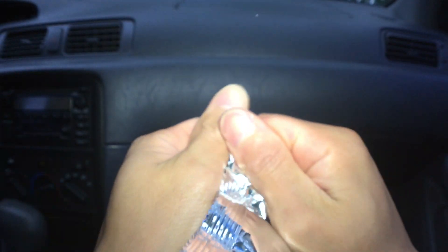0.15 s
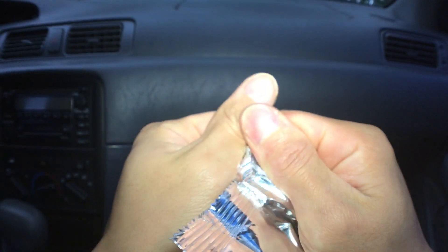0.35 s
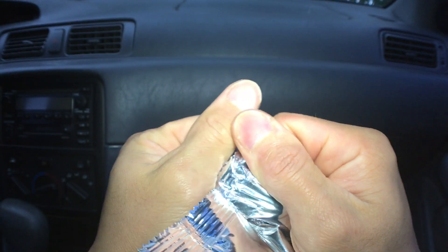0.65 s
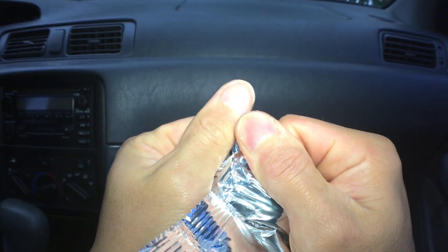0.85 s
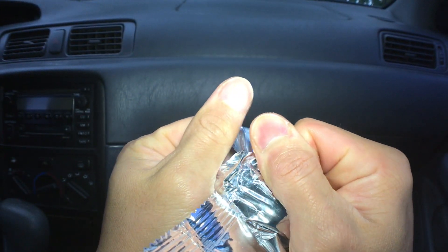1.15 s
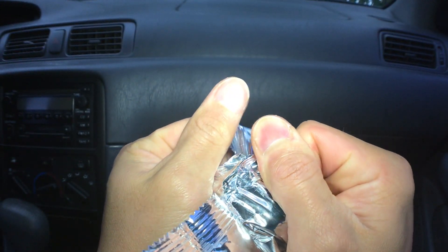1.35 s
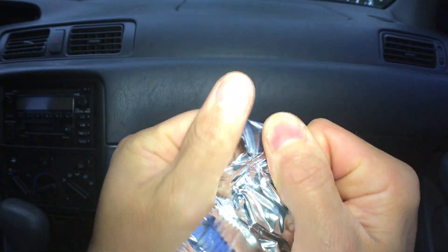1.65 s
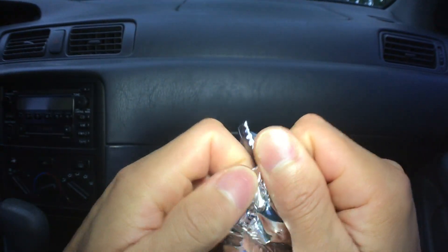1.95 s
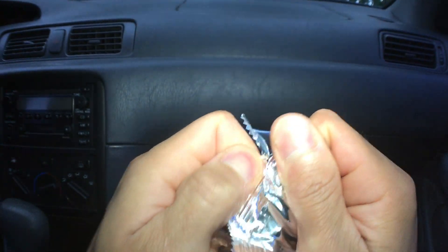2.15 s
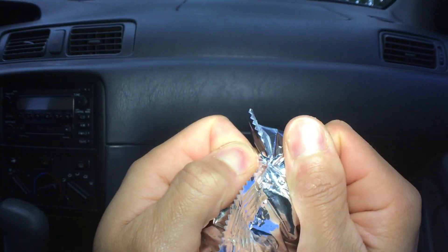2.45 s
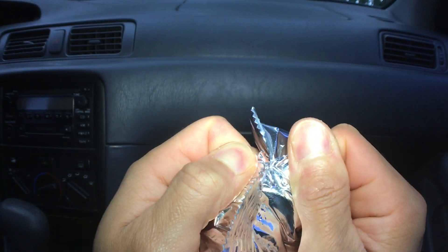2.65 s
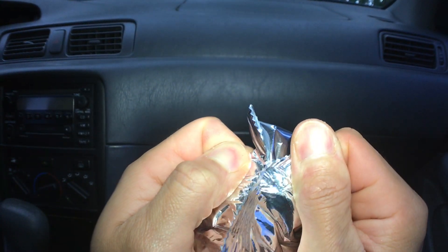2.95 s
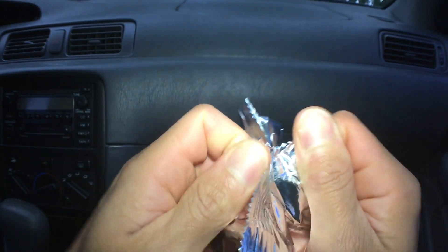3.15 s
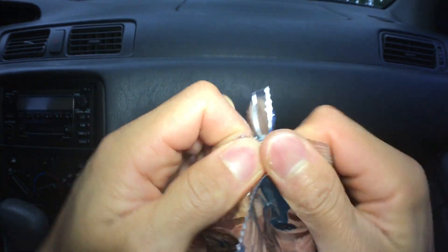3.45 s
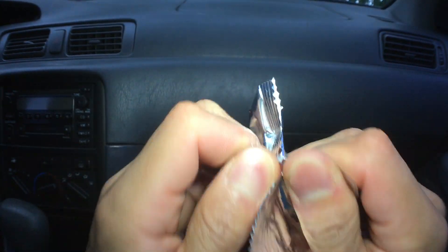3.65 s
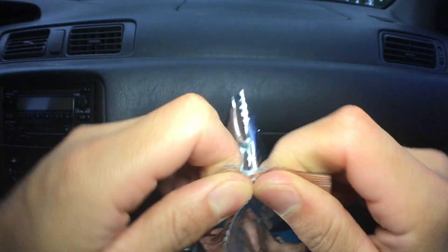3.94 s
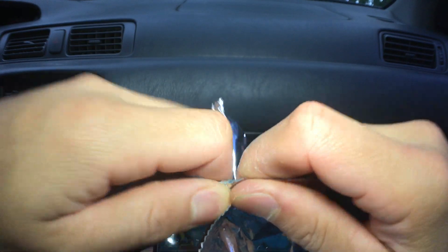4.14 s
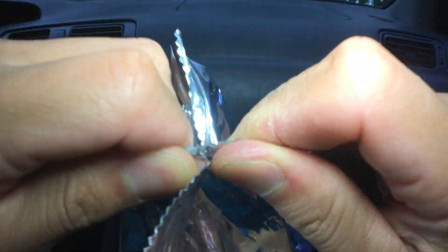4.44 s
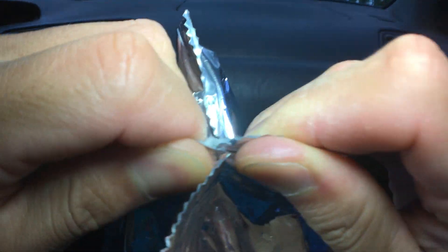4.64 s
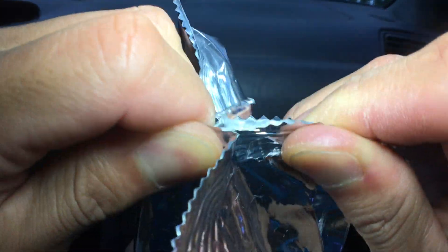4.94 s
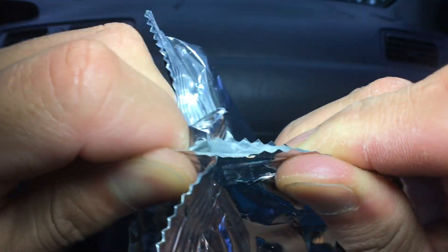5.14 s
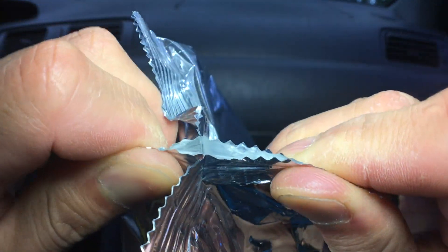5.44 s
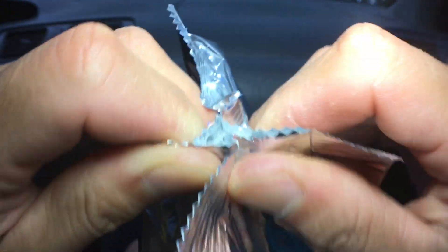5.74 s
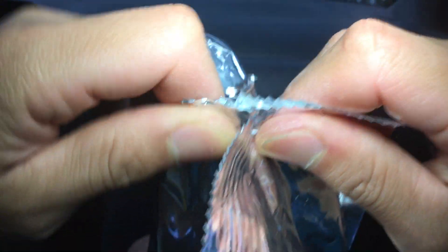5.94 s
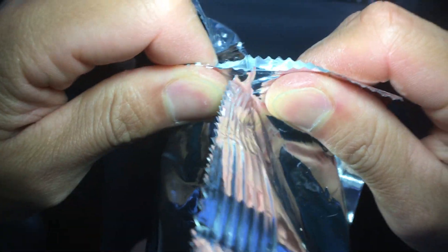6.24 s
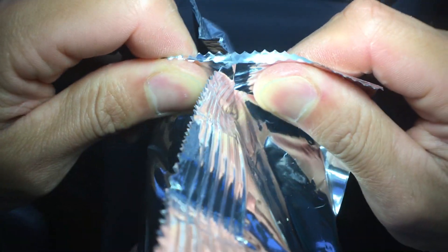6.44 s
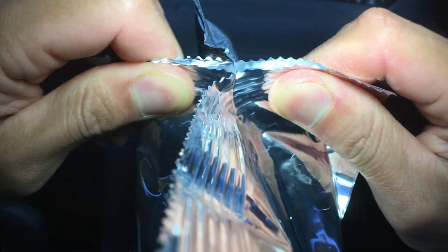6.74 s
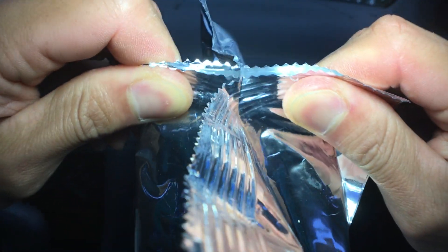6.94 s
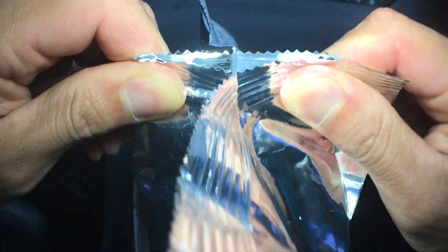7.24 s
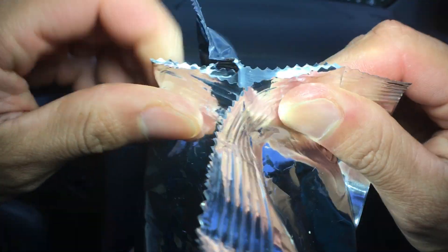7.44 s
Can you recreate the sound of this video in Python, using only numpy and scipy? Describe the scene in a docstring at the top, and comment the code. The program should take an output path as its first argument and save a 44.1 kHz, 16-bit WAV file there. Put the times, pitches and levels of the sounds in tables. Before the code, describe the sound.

An engine idles with a low, slightly pulsing hum while hands work a crisp metallic film pouch right at the microphone. Dense crackling and zippy sliding opens, then separate crunchy bursts follow with dull finger knocks and brief pitched pops. The handling grows gentler, leaving isolated clicks and faint crinkles. The small cabin is dry, with only a very short ring after each click.

```python
"""Two hands twist and pull at a foil pouch close to the microphone in a parked car.
From the start the idling engine hums in the cabin as stacked sines and the pouch crumples in random clicks.
Soon creases snap through in runs of buckles, taut film slides in stick-slip ticks and panels pop as decaying
sines. Just before one second a ridge ratchets; from two seconds on fingers knock and the grip shifts.
Clicks carry a very short ring from hands and dashboard; the crumpling thins out towards the end."""
import sys
import numpy as np
from scipy import signal
from scipy.fft import rfft, irfft
from scipy.io import wavfile
from scipy.ndimage import uniform_filter1d

SR = 44100
rng = np.random.default_rng(int(sys.argv[2]) if len(sys.argv) > 2 else 0)


def unload_wav(signal):
    """Save mono or channel-first audio to the path in sys.argv[1] as 16-bit WAV at rate SR, clipped to [-1, 1]."""
    wavfile.write(
        sys.argv[1],
        SR,
        np.round(np.clip(np.atleast_2d(signal).T, -1, 1) * 32767).astype(np.int16),
    )


N = 334719
TIME = np.arange(N) / SR  # seconds

# Idling engine. Each row: time in seconds, mean firing rate in Hz.
IDLE = [(0, 46.45), (1.2, 45.66), (2.6, 45.26), (3.05, 44.35), (3.6, 46.39), (5.1, 46.28), (7.55, 44.1)]
# Boom of the body. Each row: time in seconds, then mean level in dB at 1, 2, 3 and 4 times the firing rate.
BOOM = [(0, -54, -51.5, -50, -61), (0.6, -47, -56, -45.5, -63), (1.05, -45.0, -48, -45, -50.5),
        (1.7, -45.5, -46.5, -43, -50.5), (2.4, -50.5, -45.5, -51, -54.5), (3.0, -58, -46.5, -54, -54),
        (3.9, -70, -49.5, -57, -59), (5.0, -72.5, -55, -53.5, -57.5), (5.8, -65, -57, -70, -60),
        (7.5, -59, -60, -61, -61)]
# Colour of the cabin air. Each row: frequency in Hz, relative density in dB per Hz.
CABIN_COLOUR = [(28, 2.5), (50, -11), (120, 1), (170, -1), (280, -13), (2000, -36.5), (16000, -32)]
# Squeezes of the pouch. Each row: start in seconds, length in seconds, relative level in dB, brightness in dB.
SQUEEZES = [(0, 0.0094, -33, 2), (0.069, 0.4, -41.5, 4), (0.516, 0.25, -45.5, 1),
            (0.977, 0.223, -49.5, -3.5), (1.208, 0.35, -48, 3.5), (1.617, 0.19, -43.5, -1),
            (1.789, 0.19, -46.5, -2.5), (2.019, 0.12, -46.5, 1), (2.099, 0.093, -37, 2),
            (2.266, 0.017, -40.5, 0.5), (2.335, 0.13, -49.5, 2.5), (2.494, 0.032, -38, 2.5),
            (2.586, 0.48, -55.5, 4), (3.119, 0.18, -43, -5), (3.308, 0.16, -46.5, 0), (3.504, 0.11, -43, 2),
            (3.573, 0.19, -39.5, -1), (3.79, 0.046, -44.5, 2), (3.902, 0.062, -50.5, -1.5),
            (3.99, 0.086, -42.5, 0), (4.131, 0.19, -53.5, -0.5), (4.339, 0.14, -60.5, -7),
            (4.473, 0.077, -62.5, -3), (4.658, 0.076, -58, -5), (4.844, 0.05, -50, -0.5),
            (4.968, 0.043, -57.5, -5.5), (5.064, 0.18, -70, 4.5), (5.752, 0.044, -50, 3),
            (5.836, 0.4, -59, -4), (6.239, 0.094, -63, -6), (6.535, 0.03, -58, 9),
            (6.788, 0.064, -56.5, -5), (6.9, 0.066, -69.5, -13), (7.063, 0.054, -62.5, -6),
            (7.167, 0.033, -52, -1), (7.246, 0.16, -59.5, -3), (7.417, 0.067, -69.5, -11)]
# Colour of snaps and crumpling. Each row: frequency in Hz, relative gain in dB.
FOIL_COLOUR = [(200, -15), (550, -2.5), (790, -9), (1150, -0.5), (1600, 2), (2400, 3.5), (3600, 2.5),
               (5500, -3), (7500, -4.5), (12000, 0.5), (16000, -5)]
# Creases snapping through. Each row: start in seconds, relative levels in dB of panel (210-1010 Hz),
# crack (1.3-5.25 kHz) and sizzle (above 6.6 kHz), half the time over which the buckles spread in seconds.
SNAPS = [(0.0815, -40.5, -38, -28.5, 0.0085), (.106, -34, -22, -19.5, 0.00037),
         (0.136, -31, -31, -24, 0.0022), (0.146, -39.5, -26.5, -25, 0.004), (0.1649, -43, -36, -25, 0.0011),
         (0.175, -54, -30, -26.5, 0.0025), (0.2116, -34, -29.5, -29.5, 0.003),
         (0.342, -45, -32, -53, 0.00082), (0.425, -61, -24.5, -29.5, 0.000061),
         (0.441, -38, -28.5, -37, 0.00034), (0.5108, -41, -25, -26, 0.00044),
         (0.577, -54, -37.5, -55, 0.00041), (0.62, -45, -37, -36.5, 0.0014),
         (0.643, -48, -29.5, -30, 0.00018), (0.7354, -40, -35.5, -24, 0.00043),
         (1.033, -50, -36.5, -28.5, 0.0059), (1.106, -51, -38.5, -39, 0.0013),
         (1.148, -47, -31, -32, 0.0028), (1.2432, -65, -50, -31, .005), (1.486, -54, -41.5, -43, 0.0022),
         (1.6528, -62, -31.5, -36.5, 0.00079), (1.7165, -41, -31.5, -40, 0.00047),
         (1.742, -36.5, -29.5, -22, 0.0013), (1.8186, -43, -36.5, -37, 0.0029),
         (1.8793, -35.5, -40, -45, 0.0084), (1.9088, -48, -30.5, -28, 0.0011),
         (1.951, -47, -33, -26, 0.00067), (2.143, -40, -31, -29.5, 0.0021),
         (2.1598, -34.5, -37, -31, 0.0032), (2.19, -57, -48, -36, .0003),
         (2.2104, -61, -32.5, -32, 0.00073), (2.231, -58, -37, -32.5, 0.00032),
         (2.243, -34, -38.5, -35, 0.00035), (2.3706, -43, -45, -44, 0.0044),
         (2.748, -61, -38.5, -34, 0.0012), (2.759, -45.5, -43, -46, 0.00054),
         (2.803, -67, -50, -38, 0.0011), (2.843, -66, -53, -43, 0.00043), (2.892, -64, -52, -34.5, 0.00029),
         (2.928, -75, -68, -37, 0.00028), (2.9701, -51, -43, -33.5, 0.0077),
         (3.0968, -68, -52, -38, 0.0011), (3.1076, -38.5, -31.5, -32, 0.00032),
         (3.1574, -50, -42, -34, 0.00036), (3.166, -46, -31, -42, 0.00014), (3.194, -41, -40, -41, 0.00027),
         (3.317, -52, -43, -37.5, 0.00033), (3.2606, -36.5, -34.5, -34, 0.0053),
         (3.3779, -42, -32.5, -38, 0.001), (3.399, -35, -36.5, -29, 0.0032),
         (3.4181, -41, -35.5, -61, 0.0018), (3.442, -42, -40.5, -39.5, 0.0017),
         (3.514, -50, -54, -33, 0.0012), (3.524, -49, -41.5, -31, 0.0014),
         (3.6402, -41, -26.5, -32.5, 0.000052), (3.654, -44, -32, -44, 0.0021),
         (3.706, -54, -37, -45, .0002), (3.7155, -42, -30.5, -28.5, 0.0012),
         (3.742, -37, -43, -37, 0.00037), (3.8192, -42.5, -32.5, -32, 0.0035),
         (3.8666, -41.5, -36.5, -40.5, 0.0019), (4.032, -64, -42, -30.5, 0.00092),
         (4.065, -57, -54, -35, .0003), (4.0799, -39.5, -33.5, -35.5, 0.0022),
         (4.107, -42.5, -44.5, -46, 0.00087), (4.1344, -44, -37.5, -41.5, 0.0015),
         (4.177, -58, -61, -41.5, 0.00094), (4.291, -52, -60, -39, 0.003), (4.3477, -70, -67, -49, .0003),
         (4.375, -41.5, -46, -59, 0.0011), (4.455, -51, -52, -38, 0.00015),
         (4.5343, -45, -40.5, -53, 0.00083), (4.671, -53, -46.5, -45, 0.0014),
         (4.696, -64, -44.5, -44.5, 0.00082), (4.7718, -51, -43.5, -44.5, 0.00061),
         (4.8571, -56, -50, -28.5, 0.0066), (4.878, -66, -46, -35, 0.0046),
         (4.904, -43.5, -52, -39, 0.00078), (4.9158, -68, -45, -36.5, 0.00029),
         (4.942, -55, -42.5, -45, 0.00016), (4.984, -53, -47.5, -54, 0.00093),
         (5.178, -56, -78, -51.5, 0.0015), (5.415, -54, -48.5, -75, 0.0017),
         (5.529, -78.5, -53.5, -49.5, 0.0019), (5.5874, -78, -40, -30.5, 0.00048),
         (5.685, -61, -64, -43, 0.00025), (5.7378, -59, -50, -39.5, 0.00033),
         (5.7461, -41.5, -68, -38, 0.0034), (5.8, -44, -52, -47, 0.00066),
         (5.8217, -49, -39.5, -59, 0.00049), (5.8531, -66, -49, -39.5, 0.001),
         (5.872, -56, -50, -36, 0.00029), (5.92, -53, -38, -40, 0.00052), (5.959, -47, -44, -36, 0.001),
         (5.9976, -48.5, -46, -45, 0.003), (6.1063, -43.5, -43.5, -58, 0.00015),
         (6.2106, -47, -50.5, -63, 0.0015), (6.3359, -45, -49.5, -59, 0.0034),
         (6.398, -45, -48.5, -63, 0.00051), (6.409, -78, -57, -43, .0006),
         (6.434, -77, -72, -35.5, 0.00038), (6.4538, -46, -51.5, -84, 0.00015),
         (6.5682, -63, -44.5, -36, 0.002), (6.621, -54, -48.5, -75, 0.0013),
         (6.7026, -54.5, -48.5, -40.5, 0.00029), (6.71, -51, -50, -39, 0.0015),
         (6.7602, -65, -40, -31.5, 0.0006), (6.7857, -56, -46, -37.5, 0.00027),
         (6.818, -54, -43.5, -60, 0.0013), (6.835, -70, -42.5, -53, 0.00012),
         (6.9001, -45.5, -54.5, -90, 0.0036), (7.1361, -44, -41.5, -34.5, 0.0004),
         (7.1729, -46, -34, -32, 0.0003), (7.209, -55, -45.5, -40.5, 0.00047),
         (6.976, -56, -56, -76.5, 0.00059), (7.3682, -62, -55, -52, 0.00026),
         (7.402, -53, -60, -47.5, 0.00088), (7.425, -49.5, -71, -72, 0.0025),
         (7.529, -82, -70, -42.5, 0.00057)]
# Strokes of the thumbs over the film. Each row: start in seconds, length in seconds, slips per second at first,
# slips per second at last, unevenness (0 regular, about 1 bunched), relative level of rasp in dB,
# relative level of hiss in dB, swell over the stroke in dB.
STROKES = [(.21, 0.17, 990, 680, .06, -39.5, -30.5, -15), (.4, .13, 560, 278, 0.47, -39.5, -44, 0),
           (.54, 0.275, 133, 95, 0.15, -39.5, -64, -1), (.99, 0.62, 2300, 1920, .85, -59, -39, -7),
           (1.63, 0.14, 1380, 900, 0.62, -43, -46.5, -2.5), (2.425, .17, 560, 340, 0.37, -59, -35.5, -1.5),
           (2.6, 0.12, 170, 107, 0.17, -76, -37.5, -0.5), (2.75, 0.3, 101, 78, 0.71, -55.5, -37, -13),
           (3.12, 0.18, 143, 148, 0.87, -53, -40, 0.5), (4.205, 0.06, 600, 300, 0.8, -44, -41, -9.5),
           (4.28, 0.23, 255, 110, 0.88, -78, -57.5, 1), (4.52, 0.76, 226, 66, 0.88, -70, -65, -2.5),
           (5.8, 0.23, 197, 220, 0.9, -90, -64, -1.5), (6.03, 0.2, 176, 93, 0.69, -56, -51, -9.5),
           (7.27, 0.44, 320, 560, 1.07, -84.5, -63.5, 13)]
# Colour of the rasp under the thumb. Each row: frequency in Hz, relative gain in dB.
RASP_COLOUR = [(350, -73), (700, -8.5), (1050, 5.5), (1400, -5), (2100, 0), (3100, -1), (5500, -6.5),
               (6500, -12), (9000, -15)]
# Colour of the thin hiss of slipping film. Each row: frequency in Hz, relative gain in dB.
HISS_COLOUR = [(1200, -41), (1800, -23), (2800, -10.5), (5300, -13.5), (6400, -8.5), (7500, -6.5),
               (9700, -9), (11300, 3), (14800, -2.5), (16000, -2)]
# Taut panels popping over with a clear pitch. Each row: start in seconds, pitch in Hz, level in dB.
POPS = [(.425, 3170, -26), (.511, 1195, -33), (.643, 2350, -32), (1.147, 610, -26.5), (1.147, 1545, -29),
        (1.909, 3650, -24.5), (3.11, 1510, -27), (3.761, 1458, -35), (4.018, 1019, -36), (4.477, 720, -44),
        (5.414, 1103, -44.5), (6.713, 962, -46), (6.898, 980, -45), (7.323, 956, -46)]
# Ticks of a taut ridge under the thumb. Each row: start in seconds, relative level in dB.
RATCHET = [(0.8207, -35), (0.8391, -37), (0.8694, -34), (0.8958, -33), (0.91, -38), (.9257, -38),
           (.9358, -39), (0.9475, -39), (0.9569, -34.5), (.965, -42), (.973, -37.5), (.9805, -38)]
# Colour of the ridge. Each row: frequency in Hz, relative gain in dB.
RIDGE_COLOUR = [(500, -28), (1000, -7), (1650, -11), (2200, -3.5), (3200, -2), (5300, -11), (6800, -15.5),
                (15000, -20)]
# Knuckles and fingers knocking. Each row: start in seconds, pitch in Hz, level in dB.
KNOCKS = [(2.03, 260, -35.5), (2.143, 195, -28.5), (2.22, 500, -23), (3.199, 380, -32.5),
          (3.417, 155, -28.5), (3.42, 520, -29), (6.395, 110, -32), (6.507, 185, -34.5)]
# The hands shift their grip. Each row: start in seconds, length in seconds, rumble level in dB.
GRIP = [(3.423, 0.36, -52.5), (4.02, .12, -55), (6.182, 0.36, -52)]

HUNT_HZ, HUNT_DEPTH, HUNT_CREST_S = 2.02, 0.013, 0.755  # the idle speeds up and sags about twice a second
BOOM_WAVER_DB, CABIN_AIR_DB = 1.3, -58.5
SQUEEZE_ATTACK_S, SQUEEZE_RELEASE_S = 0.013, 0.037
STROKE_ATTACK_S, STROKE_RELEASE_S = 0.03, 0.011
FOLD_DB, CREASE_DB = -2.5, 1.5  # broad folds and tiny creases against the crinkles
HELD_DB = -73.5  # the pouch stirs even when it is only held; relative, as the squeezes
WARP_HZ = 378  # width of the patches of colour that are evened out
EVEN_FROM_DB, EVEN_FULL_DB = -49, -23  # crack levels: soft snaps ring on one patch, hard ones crack evenly
POP_T60_S, KNOCK_DECAY_S = .042, .0045  # pop: time to fall 60 dB; knock: time constant
TOP_HZ = 15900


def undb(db):
    """Turn decibels into a gain."""
    return 10 ** (np.asarray(db) / 20)


def unit(x):
    """Scale to rms 1."""
    return x / np.sqrt(np.mean(x ** 2) + 1e-20)


def curves(table):
    """Join each column of a table by straight lines in time."""
    s, *columns = np.transpose(table)
    return [np.interp(TIME, s, column) for column in columns]


def band(x, lo_hz, hi_hz):
    """Causal band-pass."""
    edges_hz = [lo_hz, min(hi_hz, .45 * SR)]
    return signal.sosfilt(signal.butter(N=3, Wn=edges_hz, btype="band", fs=SR, output="sos"), x)


def colour(x, points, size=1024):
    """Causal minimum-phase filter through (Hz, dB) points, so that fronts stay sharp."""
    hz, db = np.transpose(points)
    bins_hz = np.arange(size + 1) * SR / size / 2
    gain = undb(np.interp(np.log(bins_hz + 1), np.log(hz), db))
    # folding the cepstrum forward gives minimum phase
    cepstrum = irfft(np.log(gain))
    cepstrum[1:size] *= 2
    cepstrum[size + 1:] = 0
    response = irfft(np.exp(rfft(cepstrum)))[:size]
    return signal.fftconvolve(x, response)[:len(x)]


def steady(x, size=1500):
    """Even out the slow level and keep the single clicks."""
    power = uniform_filter1d(uniform_filter1d(x ** 2, size=size), size=size)
    return x / np.sqrt(np.abs(power) + 1e-3 * np.mean(x ** 2))


def gesture(start_s, length_s, attack_s, release_s):
    """A finger movement sets in quickly, holds and dies away."""
    attack = np.clip((TIME - start_s) / attack_s + .5, 0, 1)
    return attack * np.exp(-np.maximum(TIME - start_s - length_s, 0) / release_s)


def ring(film_t60, film_db, cabin_t60, cabin_db, size=4000):
    """One click: a sharp front, the flutter of the sheet, then hands and dashboard throwing it back."""
    t = TIME[:size]
    film, cabin = rng.standard_normal((2, size))
    flutter = unit(film * undb(-60 * t / film_t60))
    echo = unit(cabin * undb(-60 * t / cabin_t60) * (1 - np.exp(-t / .002)))
    front = t == 0
    # both levels compare energy with that of the front
    return (undb(film_db) * flutter + undb(cabin_db) * echo) / np.sqrt(size) + front


def broadband(x, evenness):
    """Spread a click evenly over all pitches (evenness 0-1) and keep its sharp front."""
    power = uniform_filter1d(np.abs(rfft(x)) ** 2, size=max(int(WARP_HZ * len(x) / SR), 1))
    hz = np.linspace(1, SR / 2, len(power))
    correction_db = -10 * evenness * np.log10(np.abs(power) + 1e-12)
    return colour(x, np.column_stack([hz, correction_db]))


def waver(size=9000):
    """Slow random drift, spread 1."""
    held = np.repeat(rng.standard_normal(N // size + 1), size)
    return unit(uniform_filter1d(uniform_filter1d(held, size=size), size=size)[:N])


def car():
    """Firing harmonics follow the idle and boom through the body, each wavering on its own, over soft cabin air."""
    hunt = 1 + HUNT_DEPTH * np.cos(2 * np.pi * HUNT_HZ * (TIME - HUNT_CREST_S))
    phase = 2 * np.pi * np.cumsum(curves(IDLE)[0] * hunt) / SR
    out = undb(CABIN_AIR_DB) * unit(colour(rng.standard_normal(N), CABIN_COLOUR))
    for harmonic, db in enumerate(curves(BOOM), 1):
        level = undb(db + BOOM_WAVER_DB * waver())
        out += level * np.sin(harmonic * phase + 2 * np.pi * rng.random())
    return out


def squeezing():
    """Levels of folds, crinkles and creases; a bright squeeze works the tiny creases, a dull one the broad folds."""
    power = np.full((3, N), undb(HELD_DB) ** 2)
    for s, length_s, db, bright_db in SQUEEZES:
        shares = undb([db + FOLD_DB - bright_db, db, db + CREASE_DB + bright_db])
        power += np.outer(shares, gesture(s, length_s, SQUEEZE_ATTACK_S, SQUEEZE_RELEASE_S)) ** 2
    return 10 * np.log10(power)


def crumple(db, dice, rate, spread_db, lo_hz, hi_hz, t60, pitched):
    """Random buckles of very unequal size on facets of their own pitch; harder squeezing sets off more of them."""
    out = np.zeros(N)
    busy = rate * np.minimum(undb(.4 * (db + 45.5)), 4)  # buckles per second
    for k, (chance, strength) in enumerate(dice):
        size = undb(spread_db * np.minimum(np.abs(strength), 2.3))
        buckles = (chance < busy / len(dice) / SR) * np.sign(strength) * size
        facet_hz = lo_hz * (hi_hz / lo_hz) ** ((k + rng.random()) / len(dice))
        click = band(ring(t60, 0, 0.094, -0.56), lo_hz, hi_hz)
        t = TIME[:len(click)]
        note = np.sin(2 * np.pi * facet_hz * t) * np.exp(-t * np.sqrt(facet_hz) * 9)
        out += signal.oaconvolve(buckles, unit(click) + pitched * unit(note))[:N]
    return steady(colour(out, FOIL_COLOUR), size=2000) * undb(db - 5.0)


def crumpling(count=14):
    """A buckle knocks low and crinkles at once; the tiniest creases fizz on their own."""
    fold_db, crinkle_db, crease_db = squeezing()
    # folds and crinkles share their dice, so they coincide
    large = [(rng.random(N), rng.standard_normal(N)) for _ in range(count)]
    tiny = [(rng.random(N), rng.standard_normal(N)) for _ in range(count)]
    folds = crumple(fold_db, large, 170, 8.5, 350, 1150, t60=.02, pitched=1.2)
    crinkles = crumple(crinkle_db, large, 230, 9, 1100, 5500, t60=.014, pitched=.8)
    creases = crumple(crease_db, tiny, 260, 9, 5500, 17000, t60=.018, pitched=.6)
    return folds + crinkles + creases


def facet(size, count=3):
    """A patch of stretched film rings briefly at a few pitches of its own."""
    hz = 500 * 12 ** rng.random((count, 1))
    t = TIME[:size]
    return np.sum(np.sin(2 * np.pi * hz * t) * np.exp(-t * np.sqrt(hz) * 7) * np.sqrt(hz), axis=0)


def snaps(size=4000):
    """A crease gives way in a run of small buckles: gently on one patch, or with a crack across the whole sheet."""
    out = np.zeros(N + size)
    for s, panel_db, crack_db, sizzle_db, run_s in SNAPS:
        when, strength = rng.random(6), rng.standard_normal(6)
        buckles = np.zeros(size)
        buckles[0] = 2
        at = np.clip(when * 2 * run_s * SR, 0, size - 1).astype(int)
        np.add.at(buckles, at, strength * min(run_s / 0.00044, 1))  # very short runs stay one clean crack
        evenness = np.interp(crack_db, [EVEN_FROM_DB, EVEN_FULL_DB], [.2, .85])
        patch = undb(-2) * (1 - evenness) * unit(facet(size)) / np.sqrt(size)
        response = ring(0.024, 5.0, 0.057, -4.5) + patch
        run = signal.fftconvolve(buckles, response)[:size]
        click = colour(broadband(run, evenness), FOIL_COLOUR)
        snap = undb(panel_db) * unit(band(click, 210, 1010))
        snap += undb(crack_db) * unit(band(click, 1300, 5250))
        snap += undb(sizzle_db) * unit(band(click, 6600, 22600))
        start = int(s * SR)
        out[start:start + size] += snap
    return undb(-13.0) * out[:N]


def stroking():
    """Slip rate, unevenness, rasp and hiss; in a stroke the rate glides and the pressure swells or eases evenly."""
    rate, uneven, rasp, hiss = np.full(N, 1. * STROKES[0][2]), np.zeros(N), 0, 0
    for s, length_s, first, last, unevenness, rasp_db, hiss_db, swell_db in STROKES:
        along = np.clip((TIME - s) / length_s, 0, 1)
        begun = TIME >= s - STROKE_ATTACK_S / 2
        rate = np.where(begun, first * (last / first) ** along, rate)
        uneven = np.where(begun, unevenness, uneven)
        pressure = gesture(s, length_s, STROKE_ATTACK_S, STROKE_RELEASE_S) * undb(swell_db * along)
        rasp = rasp + undb(rasp_db) * pressure
        hiss = hiss + undb(hiss_db) * pressure
    return rate, uneven, rasp, hiss


def stick_slip(rate, uneven, spread_db, size=16000):
    """Ticks, regular on taut film and bunched on slack film; the faster the slide, the more alike they are."""
    gap, strength = rng.standard_normal((2, size))
    travel = np.cumsum(rate) / SR  # counted in slips
    jitter = np.interp(np.arange(size), travel, uneven)
    at = np.searchsorted(travel, np.arange(size) + 2 * jitter * gap)
    rate_there = np.interp(at, np.arange(N), rate)
    variety = np.minimum(np.sqrt(300 / rate_there), 1.2) * np.sqrt(jitter)
    return np.bincount(at, undb(spread_db * variety * strength), N + 1)[:N]


def sliding(count=4):
    """Film sticks and slips: slow slips ratchet, fast ones merge into a rasp and a thin high hiss."""
    rate, uneven, rasp_gain, hiss_gain = stroking()
    slips = stick_slip(rate, uneven, spread_db=5.5)
    # each slip jerks the taut sheet and scrapes briefly at one of a few contact spots
    jerks = signal.oaconvolve(slips, broadband(ring(0.0078, -11, 0.036, -1.5), 1.0))[:N]
    spot = rng.integers(count, size=N)
    scrapes = sum(signal.oaconvolve(slips * (spot == k), ring(.018, 5, .05, 0))[:N] for k in range(count))
    rasp = steady(colour(jerks, RASP_COLOUR)) * rasp_gain * undb(-5.5)
    hiss = steady(colour(scrapes, HISS_COLOUR)) * hiss_gain
    return rasp + hiss


def pops(size=4000):
    """A whole panel flips and rings at one pitch, soon damped by the fingers."""
    out, t = np.zeros(N + size), TIME[:size]
    for s, hz, db in POPS:
        start = int(s * SR)
        decay = np.exp(-np.log(1000) * t / POP_T60_S)
        out[start:start + size] += undb(db) * np.sin(2 * np.pi * hz * t) * decay
    return out[:N]


def ratchet():
    """A ridge ticks in a mostly quickening run; one colour but fresh noise make the ticks kin, not alike."""
    out = np.zeros(N)
    for s, db in RATCHET:
        tick = unit(colour(broadband(ring(.012, 3, .05, -2), .6), RIDGE_COLOUR))
        start = int(s * SR)
        out[start:start + len(tick)] += undb(db) * tick
    return undb(-12.5) * out


def hands():
    """Fingers knock as damped sines and a shifting grip rumbles as low noise."""
    shifting = sum(undb(db) * gesture(s, length_s, SQUEEZE_ATTACK_S, SQUEEZE_RELEASE_S)
                   for s, length_s, db in GRIP)
    out = unit(band(rng.standard_normal(N), 15, 154)) * shifting
    for s, hz, db in KNOCKS:
        since = np.maximum(TIME - s, 0)
        out += undb(db) * np.sin(2 * np.pi * hz * since) * np.exp(-since / KNOCK_DECAY_S)
    return out


def scene():
    """Car, pouch and hands at one microphone."""
    pouch = crumpling() + snaps() + sliding() + pops() + ratchet()
    return (car() + pouch + hands())[None]


def record(dry):
    """A steep elliptic low-pass cuts off the very top."""
    return signal.sosfilt(signal.ellip(10, .2, 80, TOP_HZ, fs=SR, output="sos"), dry)


dry = scene()
out = record(dry)
unload_wav(out)
```